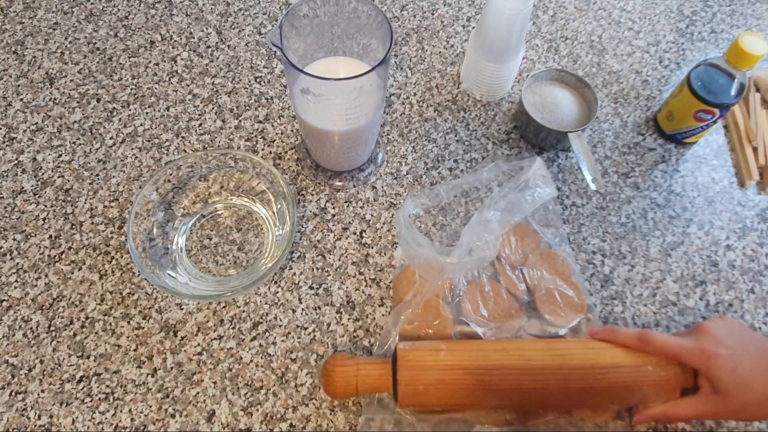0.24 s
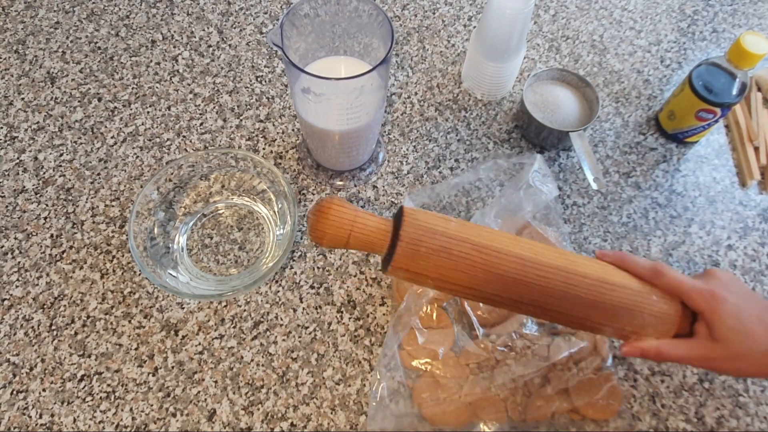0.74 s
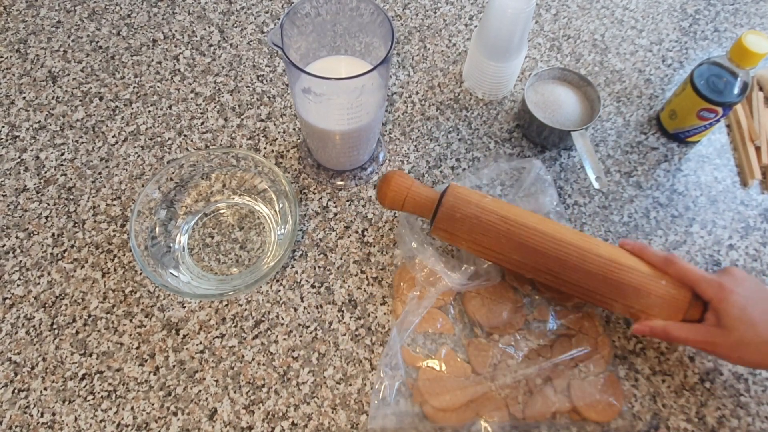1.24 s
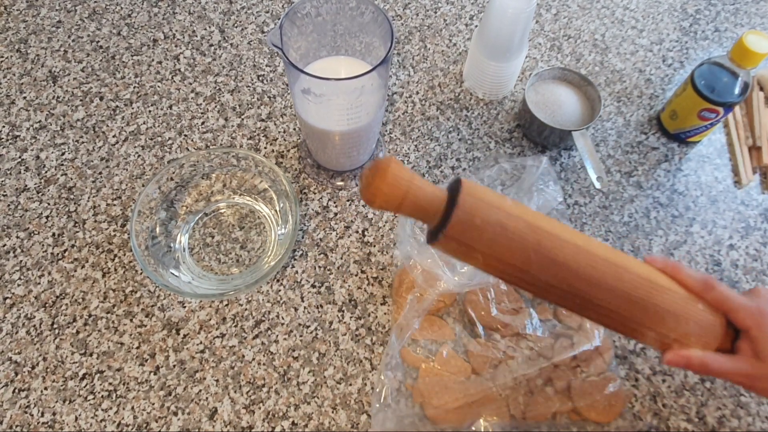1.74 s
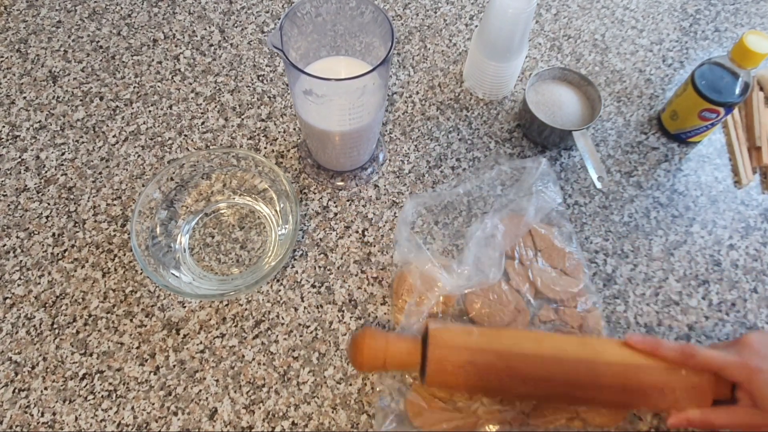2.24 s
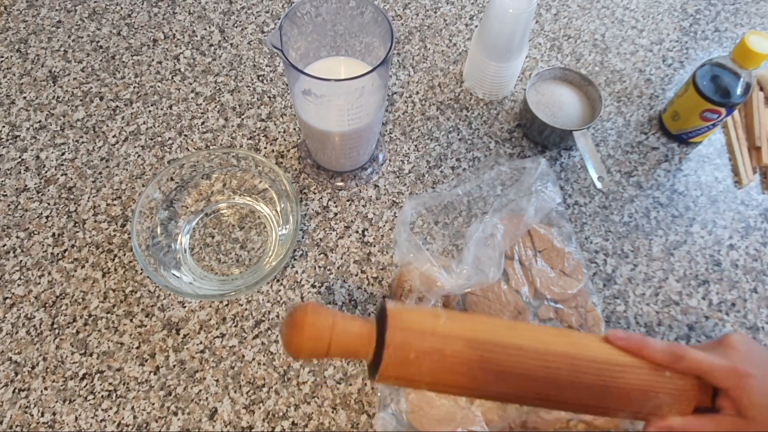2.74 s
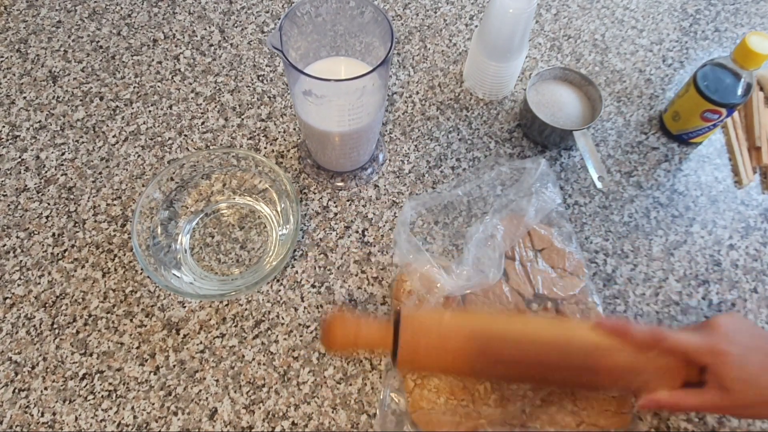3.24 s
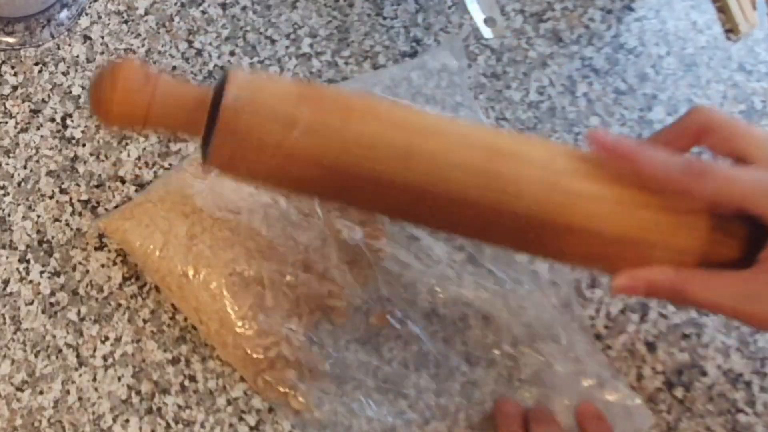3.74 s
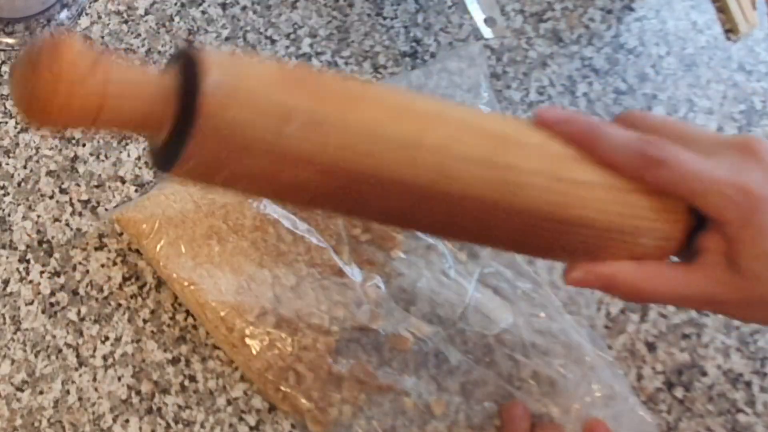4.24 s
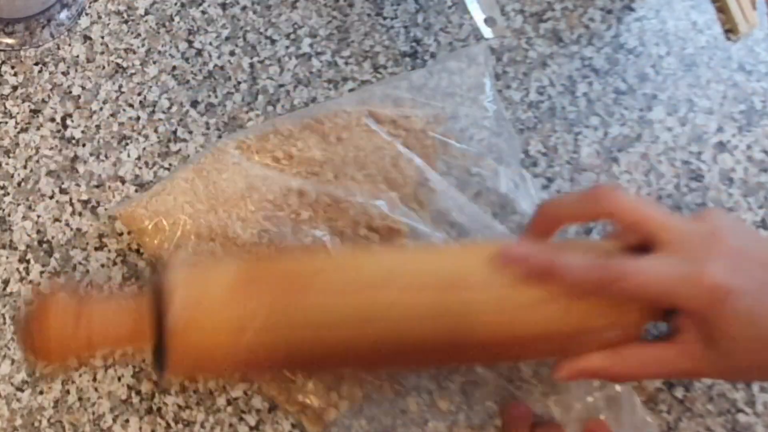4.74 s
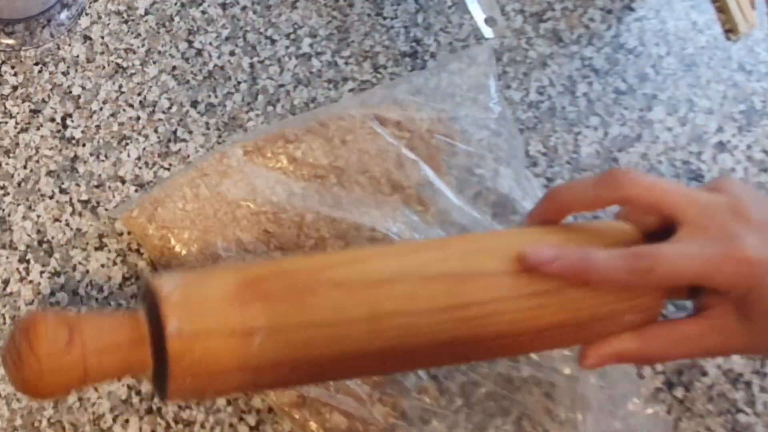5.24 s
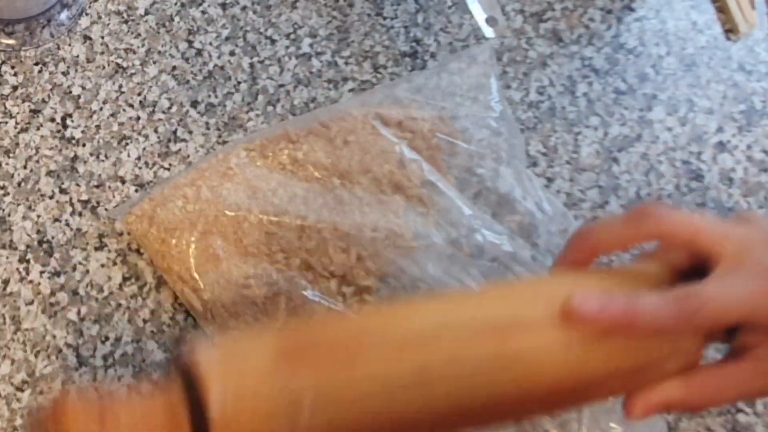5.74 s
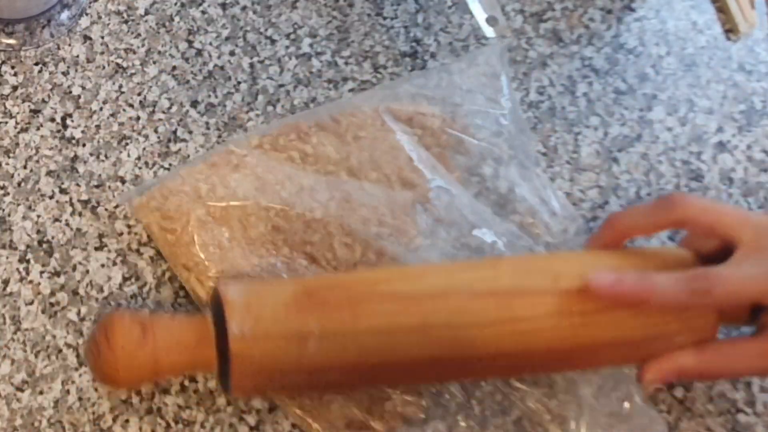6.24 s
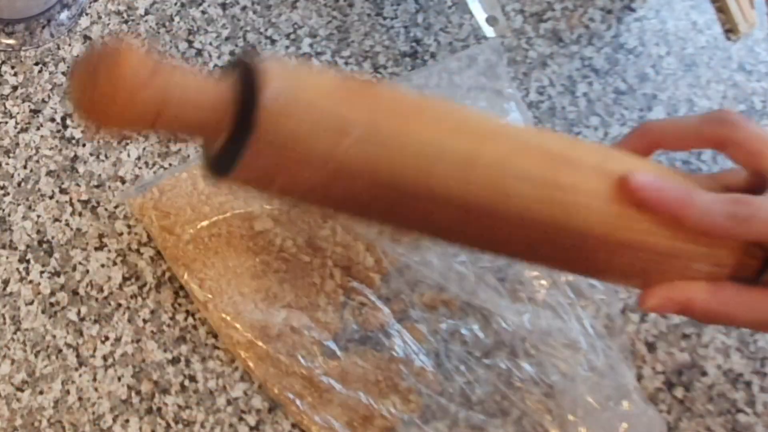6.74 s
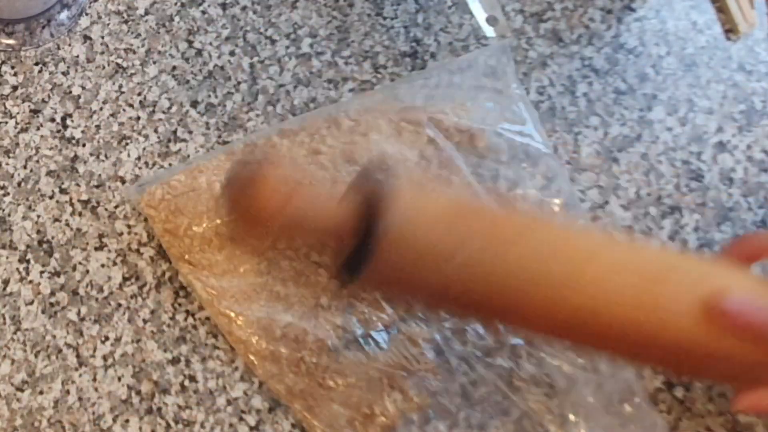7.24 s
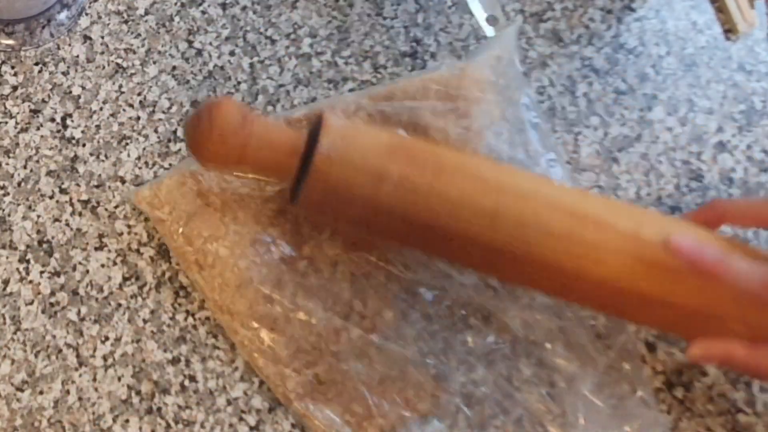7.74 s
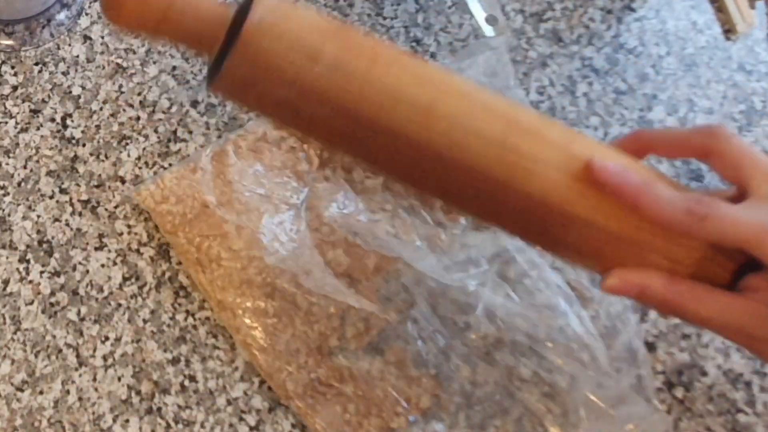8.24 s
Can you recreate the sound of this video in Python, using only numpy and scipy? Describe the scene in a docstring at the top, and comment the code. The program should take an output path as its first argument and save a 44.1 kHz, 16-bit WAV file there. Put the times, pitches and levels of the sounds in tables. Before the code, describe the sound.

A wooden rolling pin pounds a plastic bag of cookies on a stone counter, heard close up in stereo in a hard-walled kitchen. From the start until about 3.5 seconds the blows are quick and even, about five a second, each a short woody thud with a small crunch. Nearby glassware chinks faintly twice at the very beginning and again near 2.3 seconds.

At about 3.7 and 4.1 seconds come two blows with louder crunches and slight bounces, the plastic crackling and snapping between them. From there the pounding stays slower and heavier, nearly three hits a second, each ringing briefly through the counter, cabinet and room. The bag crackles again between about 5 and 5.5 seconds, with one small snap near 6. The last blow lands at about 8.1 seconds. A faint low hum lies underneath throughout.

```python
"""A hard-walled kitchen, a stereo pair near a stone counter: a wooden rolling pin pounds bagged cookies.
Each blow is a crunch of crumbs and plastic film, then a thud that rings the counter, cabinet and room.
The quick early blows are lighter and die away faster; between later blows the lifted bag crackles.
Nearby glassware chinks now and then over a faint low hum."""
import sys
import numpy as np
from scipy import signal
from scipy.fft import rfft, irfft
from scipy.io import wavfile

SR = 44100
rng = np.random.default_rng(int(sys.argv[2]) if len(sys.argv) > 2 else 0)


def master(y):
    """Save y as 16-bit WAV."""
    cut = np.clip(np.atleast_2d(y).T, -1, 1)
    pcm = np.round(cut * 32767)  # scale
    wavfile.write(sys.argv[1], SR, pcm.astype(np.int16))


N = 374409

SLOW_FROM_S, QUICK_RING = 3.6, 0.49  # blows before this time ring for this share of the later ring time
SPOTS = 3  # places on the counter that the pin takes in turn
# How alike the two microphones hear the room: freq_hz, likeness (below 0 counts as 0)
MIC_LIKENESS = [(60, 0.99), (130, 0.9), (290, 0.96), (640, 0.45), (1410, -0.16), (3100, 0.35), (6820, -4.5),
                (15000, -2.5)]
# Blows of the pin; the crumbs mostly give way just before it meets the counter:
# landing_s, strength_db, boom_db, wood_db, hardness_db, crunch_db, crunch_rise_ms, crunch_lead_ms
PIN_BLOWS = [(0.07, -21.5, 3, 0, 5, -25.5, 3.9, 2.5), (0.251, -15.5, -4, -1, 2, -25.5, 2.1, 1.5),
             (0.45, -22, 2.5, -1, 3, -20.5, 2.1, -2), (0.652, -18, -4, 3, 2, -31, 8.5, 10.5),
             (0.853, -23.5, -1.5, 0.5, 4, -24, 2.4, -2), (1.051, -13, -13.5, -2, 0, -28, 3.8, 1.3),
             (1.246, -14.5, -8.5, 0, -9.5, -15.5, 1.3, 3.5), (1.451, -12, -10, -3, -7, -38.5, 5.1, 1),
             (1.636, -15, -7.5, -.6, -1, -27.5, 4.1, -1.4), (1.839, -14.5, -6.5, -2, -1.5, -25.5, 1.2, 1.5),
             (2.047, -17.5, -0.5, 0.5, 1.5, -24.5, 0.94, 0), (2.255, -15.5, -4, -0.5, -1.5, -23, 2.6, 0.5),
             (2.461, -15, -1.5, .6, 1, -22.5, 0.83, 2), (2.677, -12.5, -9, 0.5, -1.5, -27.5, 2.4, 1.7),
             (2.885, -16, -3, 0.5, 1, -40, 2.7, 2), (3.093, -14, -4.5, -4.5, -0.5, -30.5, 2.5, -1),
             (3.3, -13.5, -13, 3.5, 0.5, -38, 3.2, -0.5), (3.498, -23, -9.5, -6.5, -0.5, -41.5, 2.1, 0.3),
             (3.66, -13.5, 0, 2.5, -2, -9.5, 5.5, 5), (4.094, -12.5, -4, 0.5, 2.5, -12, 4.5, 5),
             (4.471, -7.5, -11, -0.5, 2.5, -19.5, 3.2, 3.5), (4.809, -9, -7, 1, 3.5, -19.5, 4.6, 2.5),
             (5.159, -8, -7.5, 1, 3.5, -17.5, 3.3, 0.5), (5.494, -7.5, -7.5, 2, -0.5, -18.5, 4.7, 0),
             (5.845, -10.5, -7.5, 9.5, 10.5, -22, 2.2, 1.5), (6.207, -9.5, -9.5, 7.5, 0.5, -23, 2.6, 0.5),
             (6.567, -6.5, -17, -1.5, -2.5, -26.5, 5.6, 2.5), (6.961, -6.5, -14, -3, -3, -20.5, 2.3, 0),
             (7.326, -7.5, -14, 4, -1, -21, 2.3, 3), (7.692, -9, -15.5, 5.5, 1.5, -16.5, 4.5, 6),
             (8.108, -10.5, -7, 1, 3, -15, 1.8, 3)]


def gain_of(db):
    """Decibels to gain."""
    return 10 ** (np.asarray(db) / 20)


def curve_at(points, hz, column=1):
    """One column of a table, interpolated on a log-frequency axis."""
    table = np.transpose(points)
    return np.interp(np.log(hz + 1), np.log(table[0] + 1), table[column])


def add(mix, start_s, sound):
    """Mixes a sound in at a time."""
    part = mix[round(start_s * SR):][:len(sound)]
    part += sound[:len(part)]


def minimum_phase(db):
    """Minimum-phase impulse for a dB curve on rfft bins."""
    cepstrum = irfft(np.maximum(db, -160) * np.log(10) / 20)
    half = len(cepstrum) // 2
    cepstrum[1:half] *= 2
    cepstrum[half + 1:] = 0
    return irfft(np.exp(rfft(cepstrum)))[:half]


def stereo_noise(count, db_of, size):
    """Diffuse noise at the two microphones, alike in the bass, shaped by db_of(hz, s)."""
    hop = size // 4
    frames, hz = count // hop + 5, np.fft.rfftfreq(size, 1 / SR)[:, None]
    a, b, c, d = rng.standard_normal((frames, len(hz), 4)).T
    likeness = np.clip(curve_at(MIC_LIKENESS, hz), 0, 1)
    left = a + 1j * b
    right = likeness * left + np.sqrt(1 - likeness ** 2) * (c + 1j * d)
    spectra = np.array([left, right]) * gain_of(db_of(hz, np.arange(frames) * hop / SR))
    return signal.istft(spectra, nperseg=size, noverlap=size - hop)[1][:, :count]


def kitchen_hum(level_db=-43):
    """Room tone: a steady noise, strongest in the bass."""
    # Spectrum of the hum: freq_hz, density_db
    spectrum = [(25, -14), (45, -19), (80, -13.5), (104, -5.5), (125, -1), (200, -25.5), (400, -32.5),
                (1000, -39), (3000, -53.5), (6000, -68), (16000, -62)]
    noise = stereo_noise(N, lambda hz, s: curve_at(spectrum, hz) + 0 * s, size=4096)
    return gain_of(level_db) * noise / np.std(noise)


def glass_chinks(t60_s=0.025):
    """Nearby glassware shivers briefly after a few early blows."""
    # Rings of the glass: start_s, pitch_hz, level_db
    chinks = [(.116, 3310, -28.5), (.289, 3150, -27), (2.262, 6170, -22)]
    out, t = np.zeros(N), np.arange(4000) / SR
    for start_s, hz, db in chinks:
        envelope = gain_of(db - 60 * t / t60_s) * (1 - np.exp(-t / 0.001))
        add(out, start_s, envelope * np.sin(2 * np.pi * hz * t))
    return out


def kitchen_response(ring):
    """From one spot to the microphones: modes, then the walls' diffuse tail; ring scales decay times."""
    # Counter, cabinet and room ringing together: pitch_hz, level_db
    body_modes = [(62, -22.5), (75, 2), (82, -18.5), (92, 6.5), (104, -1), (121, -9), (132, -3),
                  (143, -6.5), (164, -4), (184, 0), (195, -14), (206, -8), (213, -11.5), (228, -11),
                  (238, -6), (248, -6.5), (277, -14), (295, -3.5), (326, -19.5), (351, 0), (369, -7),
                  (385, -1), (398, -2.5), (429, 0.5), (441, -20.5), (463, -8.5), (482, -0.5), (506, -4.5),
                  (545, -9.5)]
    # The pin itself, quickly damped by the hand: pitch_hz, level_db, t60_s
    pin_modes = [(193, 8, 0.049), (389, -15, 0.12), (480.6, -1, .16), (853, -11, .05), (1300, 6, 0.045),
                 (1580, -5.5, 0.041)]
    # Reverberation of the hard walls: freq_hz, t60_s, diffuse_db
    walls = [(61, 1, -24), (84.6, 0.45, -27.5), (125, 0.54, -24.5), (170, 0.71, -1.5), (285, 0.57, 0.5),
             (509, 0.62, 4.5), (1160, 0.51, 1.5), (2920, 0.57, 1.5), (6000, 0.46, -3.5), (8100, 0.47, -6),
             (15000, 0.27, 3)]
    t = np.arange(int(.7 * SR)) / SR
    mode_rows = [(f, db, curve_at(walls, f)) for f, db in body_modes] + pin_modes
    hz, db, t60_s = np.transpose(mode_rows)[:, :, None]
    db = db + 2.0 * rng.standard_normal(db.shape)  # each spot drives the modes unevenly
    # the microphones hear each mode a little out of step, more so for short waves
    skew = np.arccos(np.clip(curve_at(MIC_LIKENESS, hz), 0, 1)) * rng.choice([-.5, .5], hz.shape)
    fade = gain_of(db - 60 * t / (t60_s * ring))
    fade *= 1 - np.exp(-t * hz / 0.2)  # a mode takes part of a cycle to fill
    modes = np.array([(fade * np.sin(2 * np.pi * hz * t + side * skew)).sum(0) for side in (1, -1)])
    modes *= np.sqrt(2 * 500 / SR) / np.linalg.norm(modes[0])
    dull_db = 2 * (ring < 1)  # the early blows' tails lose this much at 10 kHz

    def tail_db(f, s):
        wall_t60_s = curve_at(walls, f)
        onset_db = curve_at(walls, f, column=2) - dull_db * f * 1e-4 - 10 * np.log10(wall_t60_s)
        return onset_db - 60 * s / (wall_t60_s * ring)

    tail = stereo_noise(len(t), tail_db, size=512)
    tail *= 1 - np.exp(-(t / (0.0042 * ring)) ** 2)  # builds as the walls answer
    return gain_of(-2.5) * modes + gain_of(-5.0) * tail / np.linalg.norm(tail[0])


def bag_film(rise_db_per_s=163.5, fall_db_per_s=112):
    """Short snaps of the plastic, and a fine crackle while the bag moves."""
    # The loudest snaps of the film: peak_s, level_db, pitch_hz
    snaps = [(1.23, -42, 4610), (3.552, -35, 10200), (3.5735, -33, 10100), (3.6107, -28, 10160),
             (3.7394, -27, 9300), (3.8225, -24.5, 9500), (3.8955, -32, 10300), (3.9225, -28, 4900),
             (3.9579, -36, 2550), (3.977, -35, 2000), (4.0093, -35, 8170), (4.4405, -41, 4450),
             (5.0507, -33, 5230), (5.0784, -40, 5400), (5.1023, -28, 6000), (5.1074, -23.5, 5850),
             (5.3467, -37, 4000), (5.3687, -27, 5530), (5.4789, -27, 4680), (6.039, -35, 4040)]
    # The bag shifts under the hand: start_s, level_db, hold_s
    rustles = [(3.564, -45.5, .05), (3.64, -39, .005), (3.804, -45, 0.21), (4.44, -51, .01),
               (5.11, -47, .01), (5.357, -50, .12), (6.03, -51, 0.008)]
    out, t = np.zeros(N), np.arange(-40, 160) / SR
    envelope = np.exp(-abs(t) / np.where(t < 0, .0001, .0004))
    for s, db, hz in snaps:
        snap = np.sin(2 * np.pi * hz * t) + 0.48 * rng.standard_normal(len(t))
        add(out, s, gain_of(db + 2.5) * envelope * snap)
    now, level_db = np.arange(N) / SR, np.full(N, -np.inf)
    for s, db, hold_s in rustles:
        drop_db = np.maximum(rise_db_per_s * (s - now), fall_db_per_s * (now - s - hold_s))
        level_db = np.maximum(level_db, db - np.maximum(0, drop_db))
    crackle = rng.standard_normal(N) * (rng.random(N) < .04)
    crackle *= gain_of(3.8 * np.minimum(rng.exponential(1, N), 6))
    out += gain_of(level_db) * crackle / np.std(crackle)
    return signal.lfilter(*signal.butter(2, 2400, "high", fs=SR), out)  # thin film radiates no bass


def crunch(rise_ms):
    """Crumbs break faster and faster as the pin presses in, then stop."""
    t = np.arange(-2000, 1000) / SR
    swell = np.where(t < 0, np.exp(t / (rise_ms / 1000)), np.exp(-t / .0025))
    grains = rng.standard_normal(len(t)) * gain_of(1.6 * np.minimum(rng.exponential(1, len(t)), 4))
    return swell * grains / np.sqrt(np.mean(grains ** 2))


def cookie_bag(film, bright_from_db=-24.5):
    """Crunches and film: the close sound, and three room feeds (early crunches, late crunches, film)."""
    # Tone of crumbs and film: freq_hz, gain_db
    spectrum = [(500, -44), (1000, -4), (2000, -10.5), (3500, -8), (6000, -15), (10000, -15.5),
                (16000, -28)]
    close, feeds = film.copy(), np.zeros((3, N))
    feeds[2] = film
    for landing_s, *_, db, rise_ms, lead_ms in PIN_BLOWS:
        s = landing_s - lead_ms / 1000
        crumbs = gain_of(db + 5.5) * crunch(rise_ms)
        # crunches quieter than bright_from_db sound thinner and brighter
        tilt = np.array([1, -np.clip(0.08 * (bright_from_db - db), 0, .9)])
        add(close, s + .002 - 2000 / SR, np.convolve(crumbs, tilt))
        # breaks all over the bag even out in the room: one burst of the same energy
        add(feeds[int(s > SLOW_FROM_S)], s, np.linalg.norm(crumbs) * tilt)
    colour = minimum_phase(curve_at(spectrum, np.fft.rfftfreq(1024, 1 / SR)) + 6)
    return signal.oaconvolve(close, colour)[:N], signal.oaconvolve(feeds, colour[None])[:, :N]


def thud(strength_db, boom_db, wood_db, hardness_db, ring):
    """The pin lands and rocks: a few close pushes, coloured by what lies under it."""
    # Bands of a thud: centre_hz, width_hz
    bands = [(200, 205), (80, 60), (550, 570), (1400, 1300), (3500, 2800)]
    # Make-up of each of those bands: offset_db, boom_share, wood_share, hardness_share
    band_mix = [(0, 0.0082, 0, 0.061), (0.5, 0.88, 0.024, 0), (-11.5, 0, 0.95, 0.023), (-13, 0.058, 0.2, 1),
                (-19.5, 0.083, 0.099, 0.35)]
    hz = np.fft.rfftfreq(4096, 1 / SR)
    centre_hz, width_hz = np.transpose(bands)
    band_db = strength_db + np.array(band_mix) @ [1, boom_db, wood_db, hardness_db]
    density_db = band_db + 10 * np.log10(0.043 * ring * SR ** 2 / (2 * width_hz))
    rolloff_db = 40 * np.log10(1 + (46 / (hz + 1)) ** 2) + 30 * np.log10(1 + (hz / 6500) ** 2)
    colour = minimum_phase(curve_at(sorted(zip(centre_hz, density_db)), hz) - rolloff_db)
    rock_times, rock_forces = rng.random((2, 4))
    pushes = np.zeros(250)
    pushes[(rock_times * 249).astype(int)] = 0.21 * (2 * rock_forces - 1)
    pushes[0] = -1
    return np.convolve(colour, pushes)


def rolling_pin():
    """Blows and bounces on the counter: one track a spot for the early ones, then again for the late."""
    # The pin meets the counter a second time: landing_s, strength_db, boom_db, wood_db, hardness_db
    bounces = [(0.081, -21, -14, 2.5, 1), (2.056, -26.5, -1, 4, 10), (3.112, -24.5, -5.5, -2, 1),
               (3.678, -20, -0.5, 4.5, 0.5), (4.122, -15, -7.5, 6, 4)]
    thuds = np.zeros((2 * SPOTS, N))
    contacts = sorted([row[:5] for row in PIN_BLOWS] + bounces)
    for k, (s, *levels_db) in enumerate(contacts):
        late = int(s > SLOW_FROM_S)
        add(thuds[late * SPOTS + k % SPOTS], s, thud(*levels_db, ring=1 if late else QUICK_RING))
    return thuds


def scene():
    """Pin, bag and glass reach the microphones directly and through the kitchen, over the hum."""
    # How far the left microphone leads on the bag and glass: freq_hz, lead_rad
    left_lead = [(500, 0), (2000, 1.05), (5000, 1.46), (16000, 1.66)]
    glass, film, thuds = glass_chinks(), bag_film(), rolling_pin()
    bag_close, bag_feeds = cookie_bag(film)
    # the bag sounds from beside the pin, so it has its own paths through the room
    feeds = np.vstack([thuds, gain_of(3.0) * bag_feeds])
    feeds[0] += .5 * glass
    rings = [QUICK_RING] * SPOTS + [1] * SPOTS + [QUICK_RING, 1, 1]
    paths = np.array([kitchen_response(ring) for ring in rings])
    room = signal.oaconvolve(feeds[:, None], paths, axes=2)[:, :, :N].sum(0)
    lead_rad = curve_at(left_lead, np.fft.rfftfreq(N, 1 / SR))
    close = irfft(rfft(bag_close + glass) * np.exp(.5j * lead_rad * np.array([[1], [-1]])), N)
    direct_thuds = signal.lfilter(*signal.butter(2, 2200, fs=SR), thuds.sum(0))  # crumbs cushion the pin
    return kitchen_hum() + room + gain_of(-11) * direct_thuds + close


def record(dry, ceiling=.97, top_hz=15800):
    """The microphone pair: a lean to the left, a soft ceiling on the peaks, then the band limit."""
    # Balance of the pair: freq_hz, left_minus_right_db
    balance = [(60, 0), (110, 0), (200, 0), (380, 0.5), (700, 2), (1290, 4), (2380, 2.0), (4400, 4.5),
               (8120, 0.5), (15000, 1)]
    lean_db = curve_at(balance, np.fft.rfftfreq(N, 1 / SR))
    mics = irfft(rfft(dry) * gain_of(lean_db / 2 * np.array([[1], [-1]])), N)
    limited = mics / (1 + abs(mics / ceiling) ** 6) ** (1 / 6)
    lowpass = signal.firwin(201, top_hz, window=("kaiser", 9), fs=SR)
    return signal.oaconvolve(limited, lowpass[None], "same")


dry = scene()
out = record(dry)
master(out)
```